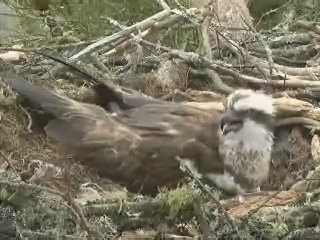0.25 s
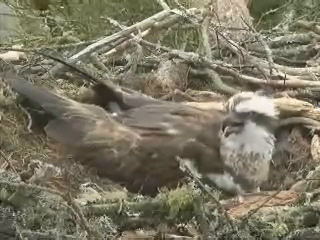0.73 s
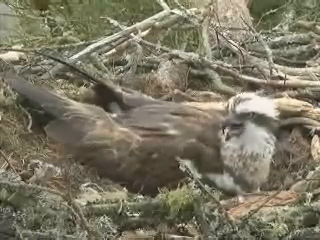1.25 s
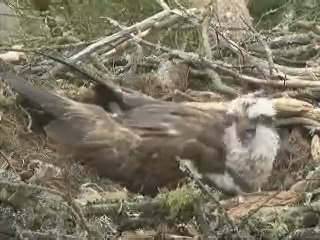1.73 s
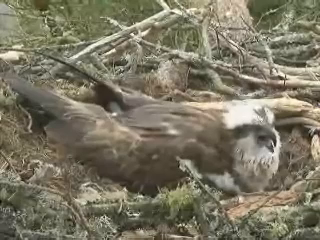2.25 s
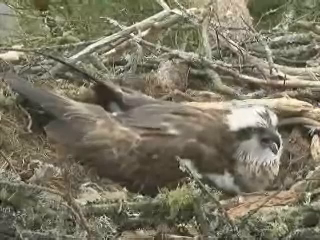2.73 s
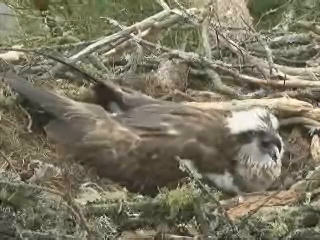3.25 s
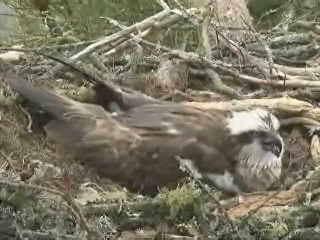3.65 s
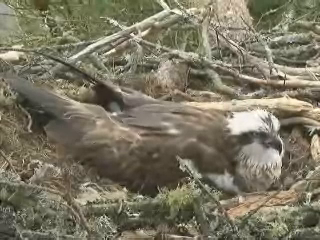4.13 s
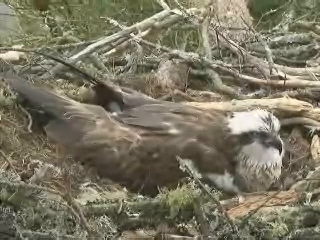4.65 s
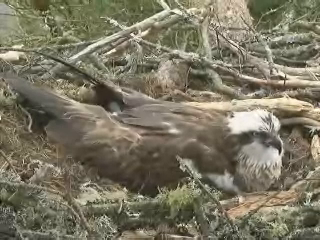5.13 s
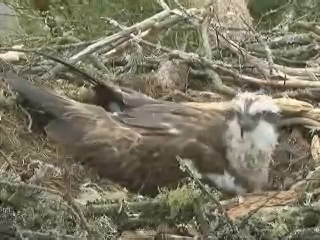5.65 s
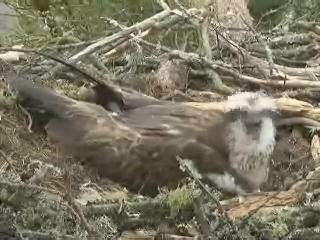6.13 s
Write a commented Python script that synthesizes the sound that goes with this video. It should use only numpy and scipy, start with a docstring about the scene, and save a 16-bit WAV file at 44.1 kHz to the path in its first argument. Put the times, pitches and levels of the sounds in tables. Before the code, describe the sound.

A large bird of prey on its stick nest gives seventeen short, piercing whistled chirps, evenly spaced about four to five a second, climbing slightly in pitch. Then comes a pause with low mains hum, soft hiss and very faint distant bird notes, before three more chirps. Light wind rumbles on the outdoor microphone; the sound sits almost entirely on the right, with only thin treble leaking to the left.

```python
"""Chirping bird of prey on its nest

A large bird of prey whistles a run of short chirps, pauses, and starts again. Each chirp is a pop, a
lower lead-in note, an arched sum of locked partials and a lower tail, with air noise, added treble
noise and echoes. Mains harmonics, noise-made wind, hiss and rustle, a faint moan and thin distant notes
lie around it. One outdoor microphone on a long cable feeds the right channel; only its treble leaks left.
"""
import sys
import numpy as np
from scipy import signal
from scipy.io import wavfile
from scipy.ndimage import uniform_filter1d

SR = 44100
rng = np.random.default_rng(int(sys.argv[2]) if len(sys.argv) > 2 else 0)


def log_audio(samples):
    """Write samples as a 16-bit WAV file to the path given in sys.argv[1]."""
    # one column per channel
    frames = np.atleast_2d(samples).T
    # limit to full scale, then quantise
    limited = np.clip(frames, -1, 1)
    pcm = np.round(limited * 32767).astype(np.int16)
    wavfile.write(sys.argv[1], SR, pcm)


N = 281358  # samples

# Harmonics of the mains: multiple of the mains frequency, level/dB
MAINS_HARMONICS = [(1, -42.5), (5, -62), (7, -65), (9, -74), (11, -66), (13, -71.5), (15, -68.5), (17, -73),
                   (19, -65), (21, -67), (23, -60.5), (25, -73.5), (27, -69.5), (29, -75.5), (31, -70.5),
                   (33, -82), (35, -73.5), (37, -73.5), (39, -83.5), (41, -75.5), (43, -74), (45, -74),
                   (47, -76), (49, -75.5), (51, -84.5), (53, -76), (55, -78), (57, -77), (59, -90.5),
                   (63, -80.5), (65, -79), (67, -80), (69, -84), (75, -83.5), (77, -90)]
MAINS_HZ = 50.0587
# Relative spectrum of the hiss: f/Hz, level/dB per Hz
HISS_SPECTRUM = [(90, -43), (200, -6), (300, -8.5), (500, -9), (1200, -11), (1640, -20.5), (3000, -21),
                 (7000, -27.5), (10400, -24.5), (11000, -31.5), (14000, -36.5)]
HISS_LEVEL_DB = -59
# Relative spectra of the idle input's noise and of the wind rumble: f/Hz, level/dB
IDLE_SPECTRUM = [(20, 10), (700, 7.0), (860, -1), (900, -61.0)]
RUMBLE_SPECTRUM = [(15, -16), (40, -2.5), (100, -0.5), (170, -23.5), (300, -25.5), (600, -78)]
# Strength of the wind: t/s, level/dB
WIND_LEVEL = [(0.0, -51), (0.23, -60), (0.32, -48), (0.41, -58.5), (0.71, -58.5), (0.78, -42),
              (0.891, -39.5), (0.96, -53.5), (1.35, -47), (1.62, -49.5), (1.85, -56.5), (3.5, -60),
              (4.71, -62.5), (5.22, -54.5), (5.65, -56), (5.74, -49), (6.13, -54), (6.179, -48.5),
              (6.38, -50)]
# Faint wavering pair of tones at the start: mean f/Hz, mean level/dB
MOAN_TONES = [(770, -63), (1030, -57)]

# One row a chirp: pop t/s, whistle t/s, whistle length/s, lead-in length/s,
#  whistle f/Hz early, middle, late, lower note f/Hz, lead-in partner f/Hz,
#  whistle level/dB early, middle, late, sag; octave level/dB early, middle, sag;
#  base level/dB of multiple 3, of 3/2 early, late, of 5/3 early, late (stage offsets are added);
#  lead-in level/dB, its partner level/dB, tail level/dB, pop level/dB
CHIRP_ROWS = [ (0.093, 0.114, 0.08, 0.013, 3093, 3170, 3190, 2350, 5460, -24.5, -23.5, -21, -28, -25.5, -32.5, -22.5, -40.5, -51, -49, -71, -77, -41.5, -62, -43, -37),
              (0.309, 0.332, 0.076, 0.022, 3158, 3192, 3194, 2390, 5600, -25, -21, -20.5, -27.5, -26, -39, -23, -41.5, -44, -54, -44, -43.5, -42, -50, -40.5, -36),
              (0.537, 0.559, 0.079, 0.021, 3152, 3200, 3198, 2390, 5500, -25.5, -21.5, -20.5, -27, -26.5, -35.5, -22.5, -40.5, -44, -60, -62, -37.5, -40.5, -49.5, -40, -39),
              (0.759, 0.783, 0.08, 0.014, 3174, 3197, 3220, 2428, 5530, -25, -21, -20.5, -28, -26, -32.5, -23.5, -41.5, -52, -55, -43.5, -38.5, -37.5, -45, -42, -35.5),
              (0.985, 1.007, 0.079, 0.018, 3166, 3191, 3205, 2425, 5460, -26, -20, -21.5, -26.5, -26.5, -40, -24, -41.5, -48, -52, -63, -49.5, -43, -46, -41, -34),
              (1.199, 1.221, 0.086, 0.026, 3200, 3280, 3250, 2476, 5730, -24, -23, -21.5, -26.5, -30.5, -54, -24.5, -52, -43, -41, -49, -36.5, -47.5, -49.5, -38.5, -33.5),
              (1.408, 1.433, 0.088, .013, 3226, 3239, 3284, 2520, 5140, -23, -22.5, -21.5, -26, -29, -34, -24.5, -49.5, -44, -42.5, -44, -35.5, -36.5, -42.5, -38, -35),
              (1.650, 1.677, 0.075, 0.024, 3277, 3330, 3350, 2516, 5560, -23, -24.5, -26, -24.5, -28.5, -35, -24, -49.5, -41.5, -36, -51, -38, -40, -46, -37.5, -35.5),
              (1.873, 1.896, 0.088, 0.014, 3368, 3390, 3407, 2647, 5520, -23.5, -19, -17.5, -28, -38, -74, -33.5, -49, -42.5, -37.5, -58, -62, -34.5, -48, -39.5, -37.5),
              (2.086, 2.112, 0.083, 0.015, 3463, 3457, 3452, 2697, 4750, -21.5, -23, -22, -24, -41, -32.5, -31.5, -53, -42.5, -35, -55, -54, -34.5, -49, -35.5, -36),
              (2.299, 2.323, 0.088, 0.017, 3458, 3438, 3484, 2686, 5300, -21.5, -25.5, -19.5, -25, -37.5, -35, -32.5, -57, -37.5, -38.5, -65, -70, -35.5, -49, -35.5, -33.5),
              (2.515, 2.543, 0.081, .017, 3487, 3467, 3516, 2680, 5350, -21.5, -20, -20.5, -23.5, -37, -38, -31, -49, -39.5, -34.5, -60, -57, -32.5, -45, -33.5, -35),
              (2.733, 2.757, 0.078, 0.021, 3526, 3529, 3520, 2710, 5400, -21.5, -18.5, -22, -24, -37.5, -39.5, -32.5, -48, -37.5, -38, -65, -67, -37, -51.5, -33.5, -34.5),
              (2.947, 2.973, 0.084, 0.015, 3533, 3514, 3546, 2735, 5390, -21.5, -19, -20.5, -25.5, -38, -37.5, -33, -49.5, -38, -39, -54, -57, -33, -42, -31.5, -36.5),
              (3.175, 3.202, .082, 0.025, 3547, 3534, 3532, 2710, 5470, -21.5, -17.5, -21.5, -26.5, -37.5, -38, -31, -44, -37, -35.5, -63, -75, -36, -45, -33.5, -36),
              (3.423, 3.452, 0.09, .019, 3500, 3530, 3563, 2700, 5450, -24, -20.5, -18, -28, -36, -35.5, -32, -46, -42.5, -32.5, -61, -59, -32, -49, -31.5, -38.5),
              (3.663, 3.694, 0.088, 0.017, 3528, 3534, 3545, 2706, 5400, -22.5, -18.5, -22, -26, -34.5, -44, -32, -46, -38, -33.5, -62, -69, -32, -43, -31, -39.5),
              (5.798, 5.852, 0.051, 0.032, 2955, 2990, 3012, 2343, 4780, -27.5, -24.5, -24, -30, -46, -31, -25.5, -45.5, -59, -51, -68, -65, -32.5, -46.5, -44, -49),
              (6.000, 6.024, 0.078, 0.018, 3014, 3037, 3160, 2500, 5750, -25, -22.5, -24.5, -30, -28.5, -32.5, -26.5, -45, -50, -43, -67, -42, -48, -53.5, -44, -34.5),
              (6.198, 6.227, 0.069, 0.018, 3298, 3306, 3380, 2730, 5790, -23, -22.5, -33, -25, -41.5, -52, -38, -66, -47.5, -43.5, -61, -63, -32, -49, -33, -35.5),
              ]
# Partials of the whistle: multiple of its frequency
PARTIAL_MULTIPLES = (1, 2, 3, 3 / 2, 5 / 3)
# Weaker partners of the broken multiples: multiple, index of the partial it follows
BROKEN_PARTNERS = [(1 / 2, 3), (5 / 2, 3), (8 / 3, 4), (4 / 3, 4)]
# Offset of each partner from the partial it follows: level/dB
PARTNER_OFFSET_DB = (-21.5, -18, -16.5, -14.5)
# Stages of every whistle: start, early, middle, late, sag, end [share of its length]
STAGE_SHARES = (0, .16, .45, .72, .9, 1)
# Octave offset: at the start from early, at late from the sag, at the end from the sag [level/dB]
OCTAVE_OFFSET_DB = (-3, -9, -11)
# Multiple 3 offset from its base: start, early, middle, late [level/dB]
THIRD_OFFSET_DB = (-21, -9.5, -8, -4)
# Multiples 3/2 and 5/3, offset from their early-to-late glide: one per stage [level/dB]
HALF_OFFSET_DB = (-21, 2.5, 0, 1.5, -3, -26.5)
THIRDS_OFFSET_DB = (3.5, -5, -2.5, 0.5, -28, -30.5)
# Share of the lower note's frequency taken by the tail: early, late [1]
TAIL_SHARES = (0.99, 0.96)
# Relative spectrum of the air noise in the voice: f/Hz, level/dB
AIR_SPECTRUM = [(1500, -12.5), (2200, 3.5), (3000, -2.5), (3800, -64.5), (4400, 0.5), (5200, 6.5),
                (6600, 2), (7400, -42), (9000, -14.5), (11000, -32.5), (13500, -30.5)]
# Relative spectrum of the treble noise added in step with the octave's level: f/Hz, level/dB
ADDED_TREBLE_SPECTRUM = [(7000, -41.5), (8200, -2.5), (10600, -27), (11200, -0.5), (13500, -13)]

ONSET_HZ, SAG_HZ, END_HZ = -88.5, -105, -240  # whistle at start off the early pitch; at sag and end off the held late pitch
ONSET_DB, END_DB = -6.5, -4  # whistle at start and end, off the stage beside it
THIRD_SAG_DB, THIRD_END_DB = -2.5, -12.5  # multiple 3, off the square of the octave
OVERLAP_S, TAIL_GAP_S, TAIL_S = .003, .002, .011
LEAD_IN_HZ_PER_S = 3500
TAIL_PARTNER_HZ, TAIL_PARTNER_DB = 5210, -5.5  # level off the tail
ADDED_TREBLE_DB = -44  # off the octave's level

# Distant birds' notes: t/s, length/s, first f/Hz, last f/Hz, peak level/dB before the echoes
DISTANT_NOTES = [(4.01, 0.026, 5500, 5000, -63), (4.406, .025, 5500, 4950, -68),
                 (4.557, .03, 5600, 4850, -66), (4.25, 0.033, 5180, 5000, -68),
                 (4.415, 0.056, 4900, 4790, -66), (4.59, 0.043, 4830, 4820, -66.5),
                 (4.74, 0.05, 4760, 4830, -69), (4.892, 0.113, 4860, 4570, -70),
                 (4.951, 0.041, 2624, 2065, -50.5)]
BAND_EDGE_HZ = 13800


def gain_of(db):
    """Logarithmic levels: converts decibels to amplitude."""
    return 10 ** (np.asarray(db) / 20)


def evened(x):
    """Normalisation: scales a signal to rms 1."""
    return x / np.sqrt(np.mean(x ** 2) + 1e-20)


def add(mix, start_s, sound):
    """Superposition: adds a sound to the mix from a given time."""
    part = mix[round(start_s * SR):][:len(sound)]
    part += sound[:len(part)]


def wander(count, span):
    """Random drift: white noise smoothed twice over span samples, at rms 1."""
    noise = rng.standard_normal(count)
    return evened(uniform_filter1d(uniform_filter1d(noise, span), span))


def coloured(points, patchy_db, bins=8):
    """Spectral shaping: noise of rms 1 with a given spectrum and patches drifting in time and pitch."""
    real, imaginary, patches = rng.standard_normal((N // 256 + 5, 513, 3)).T
    patches = uniform_filter1d(patches, bins, axis=0)
    patches = evened(uniform_filter1d(patches, 10, axis=1))
    hz = np.fft.rfftfreq(1024, 1 / SR)
    f, db = np.transpose(points)
    shape = np.interp(np.log(hz + 1), np.log(f + 1), db)[:, None]
    spectrum = (real + 1j * imaginary) * gain_of(shape + patchy_db * patches)
    return evened(signal.istft(spectrum, nperseg=1024, noverlap=768)[1][:N])


def hum():
    """Harmonic series: a mains tone whose odd overtones bunch into a buzz at each zero crossing."""
    angle = 2 * np.pi * MAINS_HZ * (np.arange(N) / SR - .0058)
    out = gain_of(MAINS_HARMONICS[0][1]) * np.sin(angle)
    for k, db in MAINS_HARMONICS[1:]:
        waver = np.repeat(gain_of(db + 1.5 * wander(N // 50 + 1, 40)), 50)[:N]
        phase = (.5 if k > 20 else 1.2) * rng.standard_normal()
        out += waver * np.cos(k * angle + phase)
    return np.sqrt(2) * out


def hiss():
    """Broadband noise: a steady hiss that weakens towards the treble."""
    return gain_of(HISS_LEVEL_DB) * coloured(HISS_SPECTRUM, patchy_db=2.2)


def idle_noise():
    """Noise floor: the idle input's own low noise."""
    return gain_of(-81.0) * coloured(IDLE_SPECTRUM, patchy_db=4.5)


def wind():
    """Amplitude modulation: a low lumpy rumble on the microphone, rising and falling."""
    s, db = np.transpose(WIND_LEVEL)
    rumble = coloured(RUMBLE_SPECTRUM, patchy_db=3.5, bins=2)
    return gain_of(np.interp(np.arange(N) / SR, s, db)) * rumble


def moan():
    """Frequency modulation: two tones share a slow pitch drift and fade within a second."""
    out = np.zeros(N)
    t = np.arange(SR) / SR
    drift = np.cumsum(1 + 0.0089 * wander(SR, 1500)) / SR
    fade = np.clip((t - .04) / .05, 0, 1) * np.clip((1.0 - t) / 0.25, 0, 1)
    for hz, db in MOAN_TONES:
        level = gain_of(db + 3.0 * wander(SR, 1500))
        add(out, 0, fade * level * np.sin(2 * np.pi * hz * drift))
    return out


def pop(db):
    """Impulsive excitation: a dull damped click and a faint uneven tone sliding up towards the note."""
    t = np.arange(0, .022, 1 / SR)
    click = np.sin(2 * np.pi * 1200 * t) * t / .0004 * np.exp(1 - t / .0004)
    slide = np.sin(2 * np.pi * np.cumsum(1500 + 45000 * t) / SR) * np.sin(np.pi * t / t[-1])
    return gain_of(db) * (click + gain_of(-17.5 + 7.2 * wander(len(t), 30)) * slide)


def lower_note(start_s, length, early_hz, late_hz, db, upper_hz, upper_db):
    """Gliding partials: a brief lower note with an upper partner that bends along with it."""
    u = np.arange(-.5, 1.5, 1 / (length * SR))  # the soft skirts reach half a length either side
    angle = 2 * np.pi * np.cumsum(early_hz + (late_hz - early_hz) * (2 * u - .5)) / SR
    upper = angle * 2 * upper_hz / (early_hz + late_hz)
    swell = np.exp(-1.2 * (u - .5) ** 2 - 10.0 * (u - .5) ** 4)
    swell = swell * gain_of(2.0 * wander(len(u), 50))
    note = gain_of(db) * np.sin(angle) + gain_of(upper_db) * np.sin(upper)
    return start_s - length / 2, np.sqrt(2) * swell * note


def stages(s, length, pitch_hz, early_db, middle_db, late_db, sag_db,
           octave_early, octave_middle, octave_sag, third_db, *broken_db):
    """Piecewise contour: time, pitch and level of each partial at the six stages of one whistle."""
    u = np.array(STAGE_SHARES)
    held_hz = pitch_hz[-1]
    hz = (pitch_hz[0] + ONSET_HZ, *pitch_hz, held_hz + SAG_HZ, held_hz + END_HZ)
    whistle = (early_db + ONSET_DB, early_db, middle_db, late_db, sag_db, sag_db + END_DB)
    start, late, end = OCTAVE_OFFSET_DB
    octave = (octave_early + start, octave_early, octave_middle,
              octave_sag + late, octave_sag, octave_sag + end)
    # as the pitch sags, multiple 3 goes with the square of the octave
    third = (*np.add(third_db, THIRD_OFFSET_DB),
             2 * octave_sag + THIRD_SAG_DB, 2 * octave_sag + THIRD_END_DB)
    half, thirds = (np.interp(u, STAGE_SHARES[1:4:2], pair) for pair in np.reshape(broken_db, (2, 2)))
    return np.transpose([s + length * u, hz, whistle, octave, third,
                         half + HALF_OFFSET_DB, thirds + THIRDS_OFFSET_DB])


def whistle_tone(rows, rise_db=3600, fall_db=1900):
    """Subharmonics: an arched whistle whose strong-weak cycles add the broken multiples."""
    s, hz, *levels = np.transpose(rows)
    t = np.arange(s[0] - .02, s[-1] + 0.09, 1 / SR)
    before, after = np.maximum(s[0] - t, 0), np.maximum(t - s[-1], 0)
    edge_db = -rise_db * before - fall_db * after  # slopes in dB a second
    hz = np.interp(t, s, hz) - 9000 * before - 9000 * after  # the pitch sags at both ends
    hz = uniform_filter1d(hz, 250) * (1 + 0.00017 * wander(len(t), 60))
    angle = 2 * np.pi * np.cumsum(hz) / SR
    levels = [20 * np.log10(np.interp(t, s, gain_of(db))) for db in levels]
    levels = [uniform_filter1d(db + edge_db, 50) for db in levels]
    parts = list(zip(PARTIAL_MULTIPLES, levels))
    # partners above the octave also fade with half the dB drop of multiple 3
    third_fade = (levels[2] - levels[2].max()) / 2
    for (k, n), db in zip(BROKEN_PARTNERS, PARTNER_OFFSET_DB):
        parts.append((k, levels[n] + db + (k > 2) * third_fade))
    # all partials lock to the main tone, so the wave is lopsided
    tone = np.zeros(len(t))
    for k, db in parts:
        if k == 1:
            flutter_db = .6
        else:
            flutter_db = 1.5 if 2 * k % 1 == 0 and k < 2.2 else 3.2
        level = gain_of(db + flutter_db * wander(len(t), 90))
        jitter = 0.1 * (k > 2.2) * wander(len(t), 40)
        tone += level * np.cos(k * angle + np.pi + jitter)
    return t[0], np.sqrt(2) * tone, gain_of(levels[0]), gain_of(levels[1])


def bird():
    """Source mixture: pops, lower notes and whistles, with air noise, and added treble noise."""
    voice, air, treble_level = np.zeros((3, N))
    for row in CHIRP_ROWS:
        pop_s, s, length, lead, *pitch_hz, low_hz, partner_hz = row[:9]
        *levels, lead_db, partner_db, tail_db, pop_db = row[9:]
        add(voice, pop_s, pop(pop_db))
        lead_in = lower_note(s - lead + OVERLAP_S, lead, low_hz, low_hz + LEAD_IN_HZ_PER_S * lead,
                             lead_db, partner_hz, partner_db)
        tail = lower_note(s + length + TAIL_GAP_S, TAIL_S, *np.multiply(TAIL_SHARES, low_hz),
                          tail_db, TAIL_PARTNER_HZ, tail_db + TAIL_PARTNER_DB)
        for start, note in (lead_in, tail):
            add(voice, start, note)
            # the folds leak most in a quick change of mode: shorter notes carry more air
            add(air, start, gain_of(-3) * abs(note) * 2 * TAIL_S * SR / len(note))
        start, tone, level, octave = whistle_tone(stages(s, length, pitch_hz, *levels))
        add(voice, start, tone)
        add(air, start, gain_of(-48.5) * (level > gain_of(-48)))  # even air while the whistle sounds
        add(treble_level, start, gain_of(ADDED_TREBLE_DB) * octave)
    air_noise = coloured(AIR_SPECTRUM, patchy_db=6.5, bins=2)
    treble_noise = coloured(ADDED_TREBLE_SPECTRUM, patchy_db=4.5, bins=3)
    breathy_voice = voice + uniform_filter1d(uniform_filter1d(air, 1100), 1100) * air_noise
    # the added treble noise rises and falls with the octave's level
    return breathy_voice + uniform_filter1d(treble_level, 900) * treble_noise


def trees(x):
    """Diffuse reflection: decaying noise echoes, quick off the nest and long from the wood."""
    t = np.arange(SR // 2) / SR
    near, far = rng.standard_normal((2, len(t)))
    near *= gain_of(-60 * t / .14)  # 60 dB down in 0.14 s
    far *= gain_of(-60 * t / .42) * (t > .02)
    near *= gain_of(-14) / np.linalg.norm(near)
    far *= gain_of(-24.5) / np.linalg.norm(far)
    return x + signal.fftconvolve(x, near + far)[:N]


def far_notes():
    """Reverberation: thin gliding notes from across the trees, smeared by their echoes."""
    out = np.zeros(N)
    for s, length, from_hz, to_hz, db in DISTANT_NOTES:
        hz = np.linspace(from_hz, to_hz, round(length * SR))
        tone = np.sin(2 * np.pi * np.cumsum(hz) / SR)
        add(out, s, gain_of(db) * tone * signal.windows.tukey(len(hz), .4))
    t = np.arange(SR) / SR
    echoes = rng.standard_normal(SR) * gain_of(-60 * t / 0.53)
    return out + signal.fftconvolve(out, echoes / np.linalg.norm(echoes))[:N]


def rustle():
    """Band-passed noise: a faint grainy rustle that grows late in the pause."""
    band = signal.butter(2, [2000, 3600], "bandpass", fs=SR, output="sos")
    grains = signal.sosfilt(band, rng.standard_normal(N))
    growth = np.clip((np.arange(N) / SR - 4.8) / .5, 0, 1)
    return gain_of(-59.0 + 3.0 * wander(N, 300)) * growth * grains


def scene():
    """Superposition: every source reaches the one microphone; the idle input holds its own noise."""
    mic = hum() + hiss() + wind() + moan() + trees(bird()) + far_notes() + rustle()
    return np.array([idle_noise(), mic])


def record(dry):
    """Crosstalk and band limiting: treble leaks into the idle channel, then both are low-passed."""
    treble = signal.firwin(2047, 860, pass_zero=False, fs=SR)
    leak = gain_of(-18.5) * signal.oaconvolve(dry[1], treble, "same")
    both = np.array([dry[0] + leak, dry[1]])
    low_pass = signal.firwin(511, BAND_EDGE_HZ, window=("kaiser", 9), fs=SR)
    return signal.oaconvolve(both, low_pass[None], "same")


dry = scene()
out = record(dry)
log_audio(out)
```